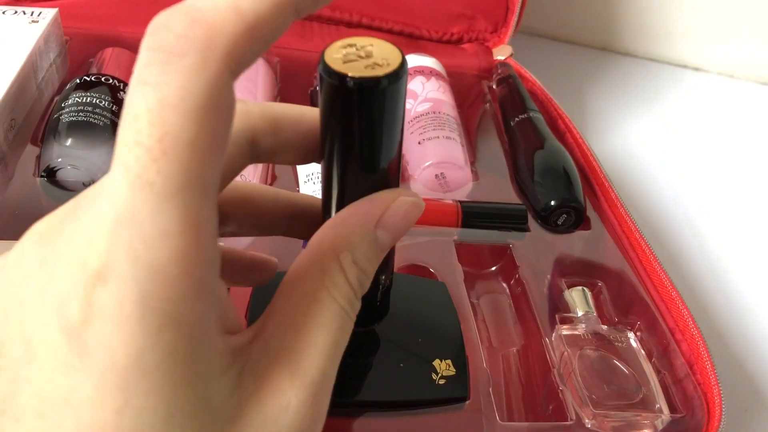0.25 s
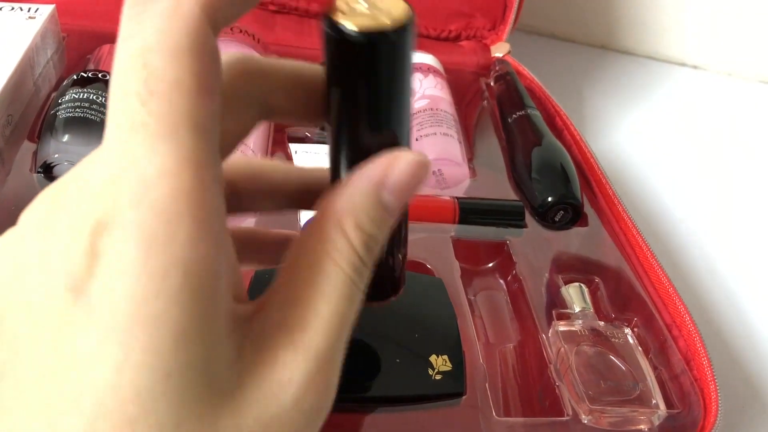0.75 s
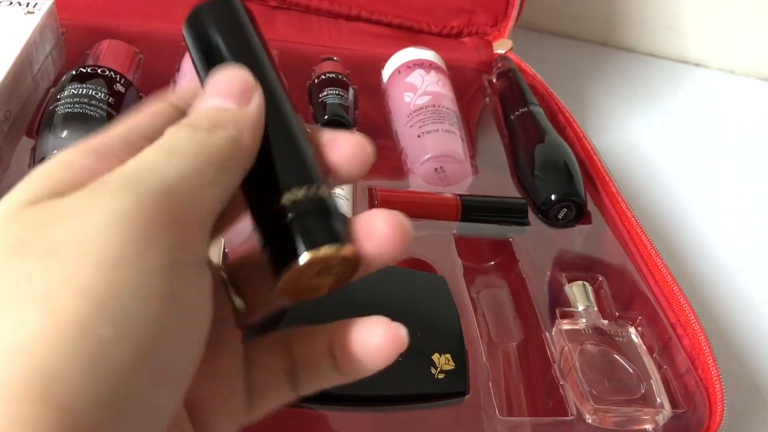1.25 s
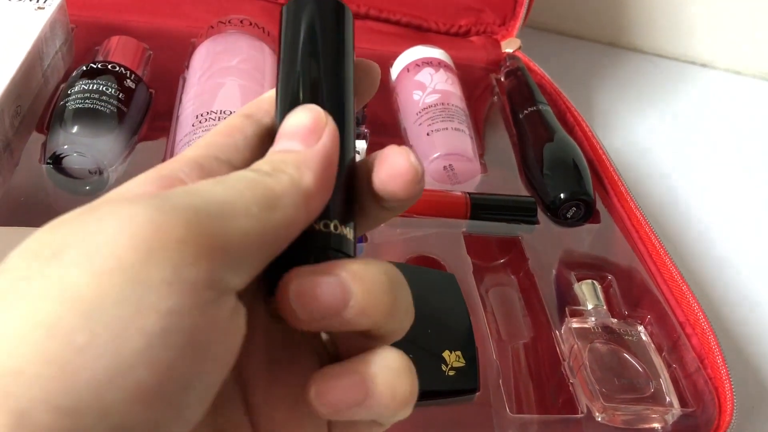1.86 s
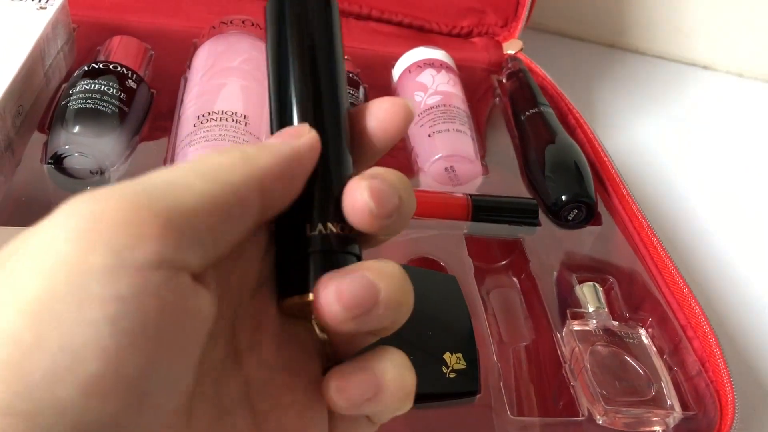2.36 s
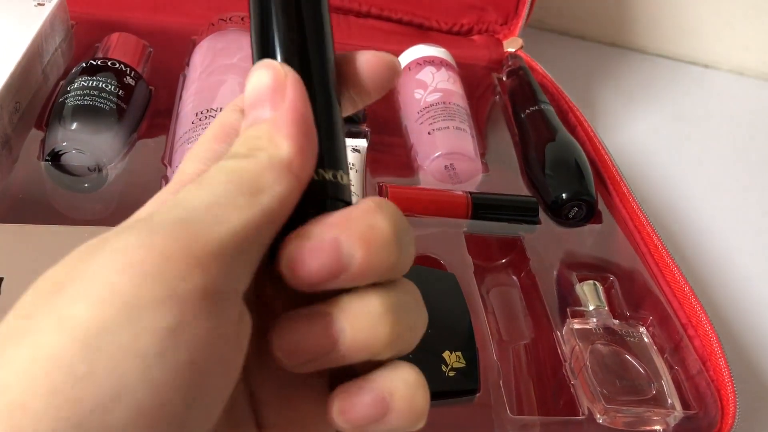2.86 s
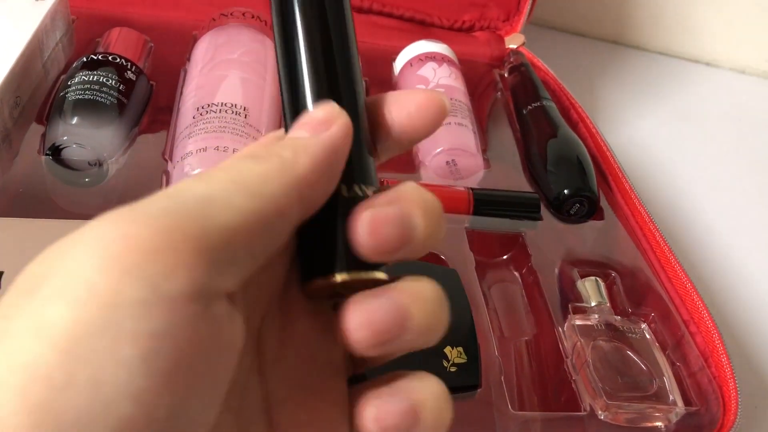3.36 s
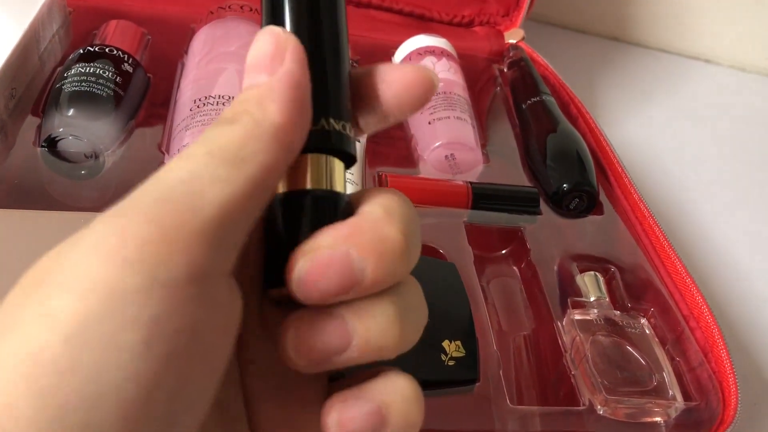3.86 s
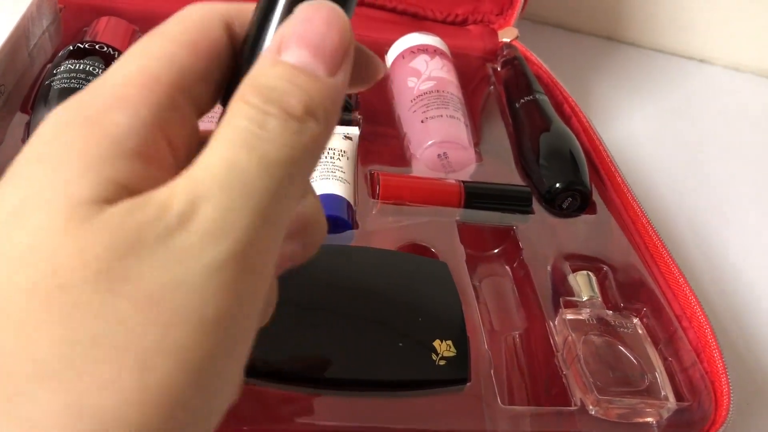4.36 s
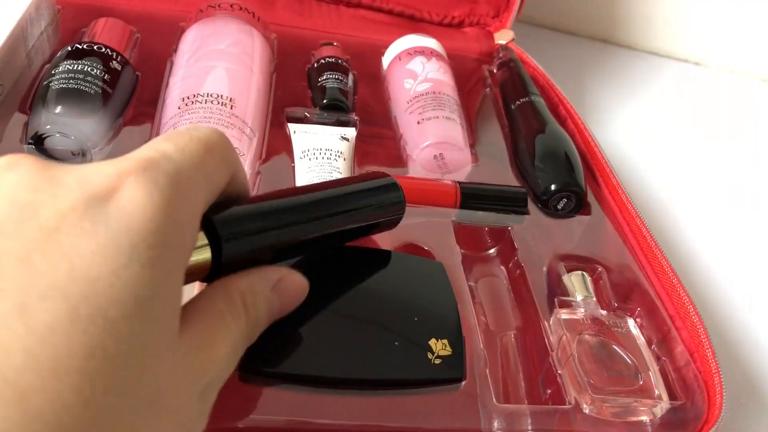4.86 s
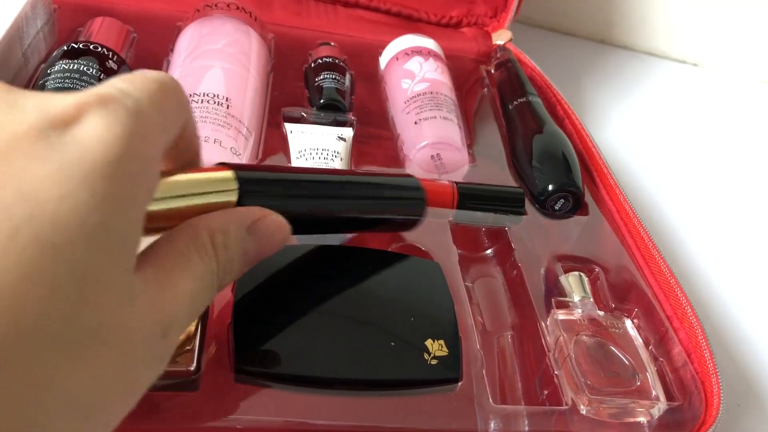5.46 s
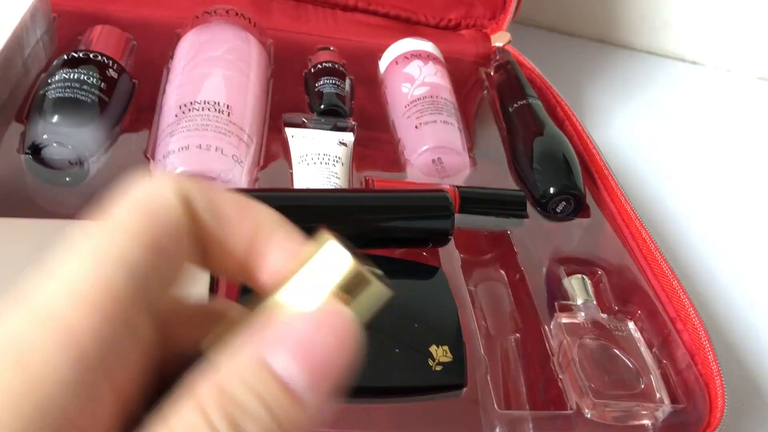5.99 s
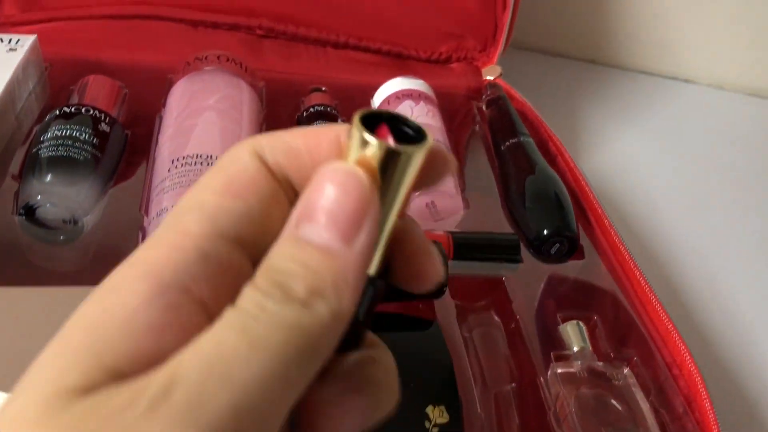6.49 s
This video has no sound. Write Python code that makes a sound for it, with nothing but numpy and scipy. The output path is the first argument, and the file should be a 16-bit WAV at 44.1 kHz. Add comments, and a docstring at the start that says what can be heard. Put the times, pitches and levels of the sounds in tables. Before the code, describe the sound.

Small dry clicks of a lipstick in the hand, heard close with short indoor reflections and a faint hush beneath. Skin slips in short squeaks and stuttering creaks, mixed with hollow ticks. A sharp snap comes past the middle, later plastic knocks and a short scrape, a metallic pull, and the loudest clack as the cap lands and bounces on the tray.

```python
"""A lipstick in a glossy case is turned in the hand close by, in a quiet room.
First come a few light taps and rattles: short rough contacts that ring the hollow case and metal tube.
Then the thumb creaks and squeaks on the lacquer in trains of slips, among more clicks and rattles.
Last, the lipstick is pulled from its cap and the cap falls on a thin plastic tray: knocks, metallic
rings and scrapes. Shaped noise gives the room tone and a distant outdoor wash underneath all of it."""
import sys
import numpy as np
from scipy import signal
from scipy.fft import irfft
from scipy.io import wavfile
from scipy.ndimage import uniform_filter1d

SR = 44100
rng = np.random.default_rng(int(sys.argv[2]) if len(sys.argv) > 2 else 0)


def store_pcm(level_fs):
    """Save levels as 16-bit WAV."""
    pcm = np.round(np.clip(level_fs, -1, 1) * 32767).astype(np.int16)
    wavfile.write(sys.argv[1], SR, np.atleast_2d(pcm).T)


N = 296793  # length in samples


def gain_of(db):
    """Turns decibels into a factor."""
    return 10 ** (np.asarray(db) / 20)


def evened(x):
    """Scales to rms 1."""
    return x / np.sqrt(np.mean(x ** 2) + 1e-20)


def peaked(x):
    """Scales to peak 1."""
    return x / abs(x).max()


def read(points, hz):
    """Looks up a curve over pitch, on a log-frequency axis."""
    f, value = np.transpose(points)
    return np.interp(np.log(hz + 1), np.log(f + 1), value)


def add(mix, s, sound):
    """Mixes a sound in at s seconds."""
    part = mix[round(s * SR):][:len(sound)]
    part += sound[:len(part)]


def band(x, lo_hz, hi_hz):
    """Keeps only the pitches between two limits."""
    sos = signal.butter(3, [lo_hz, min(hi_hz, SR / 2.1)], "band", fs=SR, output="sos")
    return signal.sosfilt(sos, x)


def resonate(x, hz, width):
    """A steep resonance: shifts the pitch hz down to zero, smooths twice, and shifts back."""
    turn = np.exp(2j * np.pi * np.cumsum(hz * np.ones(len(x))) / SR)
    r = np.exp(-np.pi * width / SR)
    smooth = signal.lfilter([(1 - r) ** 2], [1, -2 * r, r * r], x / turn)
    return 2 * (turn * smooth).real


# thumb strokes: (skin resonance first and last f/Hz, snap level/dB re skin,
# snap resonance first and last f/Hz, unevenness 0-1 at full pressure,
# curve of (t/s, pressure level/dB, slips per s))
THUMB_STROKES = [ (2000, 2000, 5, 7400, 6800, 1, [(1.33, -99, 430), (1.4, -82, 410), (1.44, -84, 450)]),
                 (1300, 1300, -6, 8000, 7000, .16, [(1.63, -82, 370), (1.68, -75, 346), (1.72, -63, 290),
                 (1.755, -67, 212), (1.77, -76, 200), (1.91, -77, 200)]),
                 (1520, 1500, 1, 5100, 5800, 0.38, [(1.93, -83.5, 143), (2.02, -70.5, 123),
                 (2.125, -78, 294), (2.145, -100, 490)]),
                 (2450, 1700, -0.5, 6200, 5500, 0.16, [(2.474, -67, 260), (2.487, -60, 285),
                 (2.515, -65, 247), (2.53, -74, 240), (2.655, -72, 240), (2.678, -63, 300),
                 (2.695, -60, 370), (2.712, -84.5, 390)]),
                 (1500, 2040, 1, 9200, 7500, 0.98, [(2.71, -86, 480), (2.75, -78.5, 440), (2.88, -81, 400),
                 (2.93, -80, 450)]), (3300, 3400, -21, 4200, 5000, 0.1, [(2.808, -72, 1500),
                 (2.835, -66, 880), (2.848, -65.5, 850), (2.862, -65, 1940), (2.868, -91, 1700)]),
                 (1830, 1810, 2, 6700, 7800, .6, [(2.925, -80, 300), (2.95, -73, 300), (2.97, -73, 244),
                 (3.005, -88, 335)]), (4900, 3600, -1, 9200, 7000, 0.07, [(3.4825, -69, 205),
                 (3.525, -64, 205), (3.542, -61, 280), (3.562, -63, 464), (3.58, -64, 671),
                 (3.59, -64, 771), (3.6, -65, 812), (3.61, -66, 995), (3.628, -70, 1229),
                 (3.642, -78, 1320)]), ]
# the case wall under a slip: (f/Hz, width/Hz, level/dB)
WALL_MODES = [(3400, 3000, -3.5), (11600, 2700, -7.5), (14400, 1600, -5.5)]
SLACK_PER_DB = 0.03  # slips grow uneven as the pressure eases
SNAP_FADE_RATE = 550  # above this many slips per s the snap weakens


def stroke(skin_hz, skin_end_hz, snap_db, snap_hz, snap_end_hz, firm, rows):
    """Skin sticks and slips on the lacquer: each slip is a tiny snap, fast slips merge into a squeak."""
    s, *columns = np.transpose(rows)
    t = np.arange(s[0], s[-1], 1 / SR)
    db, rate = (np.interp(t, s, c) for c in columns)
    hz = np.linspace(skin_hz, skin_end_hz, len(t))
    snap_hz = np.linspace(snap_hz, snap_end_hz, len(t))
    slack = SLACK_PER_DB * (db.max() - db) * np.sqrt(abs(firm) / .3)
    uneven = np.clip(firm + slack, 0, 1.1)
    wobble, size, bite, hiss, grit = rng.standard_normal((len(t), 5)).T
    wobble = evened(uniform_filter1d(wobble, size=250))

    # one slip at each whole turn, shared between two samples when it falls between them
    turns = np.cumsum(rate * np.exp(0.5 * uneven * wobble)) / SR
    slips = np.diff(np.floor(turns), prepend=0) * gain_of(5.5 * uneven * size)
    early = np.clip(turns % 1 / np.diff(turns, prepend=-1), 0, 1)
    slips = slips * (1 - early) + np.roll(slips * early, -1)

    rub = evened(slips) + 1.5 * uneven * hiss
    skin = resonate(rub, hz, (.78 + uneven.mean()) * hz.mean())
    skin = evened(skin - .55 * resonate(rub, np.maximum(rate, 950), 700))

    # skin lets go in a rough fraction of a millisecond
    release = signal.lfilter([1], [1, -.9], slips * gain_of(2.9 * bite))
    tear = evened(release * 1.5 * uneven * grit + .3 * slips) + 1.1 * uneven * hiss
    snap = resonate(tear, snap_hz, 3240)
    for k, (f, width, d) in enumerate(WALL_MODES):
        snap = snap + gain_of(d) * np.roll(resonate(tear, f, width), 23 * k + 17)
    snap = evened(snap) * np.minimum(SNAP_FADE_RATE / rate, 1)
    sound = skin + gain_of(snap_db) * snap
    return s[0], gain_of(db) * sound * signal.windows.tukey(len(t), .1)


# slow slips of the thumb, heard one by one:
# (t/s, peak level/dB, skin resonance f/Hz, snap resonance f/Hz, snap level/dB re skin)
SLOW_SLIPS = [(1.761, -58, 1140, 8100, -10), (1.779, -56, 1900, 3500, -6), (1.799, -59, 1600, 7890, -10),
              (1.806, -59, 1400, 4000, -4), (1.821, -60, 1410, 8180, -0.6), (1.831, -58, 1270, 7590, -0.6),
              (1.844, -57, 1420, 4500, -5), (1.853, -55, 1500, 7090, -0.6), (1.864, -54, 1390, 6750, -0.6),
              (2.52, -56, 2940, 6620, -0.6), (2.525, -56, 1460, 5610, -0.6), (2.531, -59, 2890, 5880, -0.6),
              (2.536, -58, 1170, 6060, -0.6), (2.551, -58, 2140, 6070, -0.6), (2.56, -59, 3070, 6130, -0.6),
              (2.568, -57, 3340, 6560, -0.6), (2.578, -63, 2100, 6830, -0.6),
              (2.589, -55, 2190, 5960, -0.6), (2.745, -63, 980, 6170, -0.6), (2.753, -62, 1180, 6750, -0.6),
              (2.761, -62, 877, 6730, -0.6), (2.771, -60, 912, 8130, -0.6), (2.781, -59, 869, 6780, -0.6),
              (2.794, -61, 842, 5730, -0.6), (2.805, -59, 3150, 4700, -0.6), (2.88, -55, 1470, 5380, -9),
              (2.89, -57, 2000, 4520, -8), (2.903, -61, 2380, 8500, -0.6), (2.907, -63, 1380, 9400, -0.6),
              (2.917, -60, 1210, 6980, -0.6), (2.932, -62, 1780, 6900, -0.6),
              (2.937, -56, 1700, 9470, -0.6), (2.943, -56, 1460, 7000, -0.6),
              (2.951, -53, 1610, 6970, -0.6), (2.961, -53, 2340, 6960, -0.6), (2.964, -55, 888, 7020, -0.6)]
SLIP_MS, SLIP_WIDTH_HZ = 1.1, 1500  # fading time of the puff, width of the skin resonance


def slip(s, db, skin_hz, snap_hz, snap_db):
    """One stick-slip release: a rough puff through the skin and the case wall."""
    t = np.arange(600) / SR
    puff = rng.standard_normal(len(t)) * np.exp(-1000 * t / SLIP_MS)
    snap = peaked(resonate(puff, snap_hz, 1.6 * SLIP_WIDTH_HZ))
    snap = snap + .55 * peaked(band(puff, 3000, 15000))
    skin = peaked(resonate(puff, skin_hz, SLIP_WIDTH_HZ))
    return s, gain_of(db) * (skin + gain_of(snap_db) * snap)


# taps and rattles in the hand that stand out: (t/s, crack level/dB, then levels/dB re crack of
# hollow body, treble and metal ring; the clearest also have contact/ms, brightest f/Hz and
# the level/dB re crack of that accent)
HAND_TICKS = [(0.036, -70, -6, 5, -23, 1.5, 5500, 3), (0.0435, -72, 2, 0, -25), (0.058, -73, 0, 6, -25),
              (0.0718, -50, 5, -20, -30, 1, 2300, -3), (0.0738, -40.5, -1, -3, -30, .8, 5150, -3),
              (0.0905, -60, 5, -16, -18), (0.6337, -52, -14, -12, -12, .6, 7150, 3),
              (0.6338, -54, -14, -20, -30, .6, 2735, 3), (0.638, -66, -14, -12, -12, 1, 7150, 3),
              (0.6497, -64, -16, -6, -12, 1, 7200, 0), (0.732, -65, 4.5, -22, -20),
              (0.7428, -66.5, 4.5, -22, -9), (1.3967, -64.5, -21, -12, -18), (1.6548, -63, 3, -10, -14),
              (1.7185, -60, 6, -12.5, -4), (1.8775, -54, -1, -12, -21, 2.2, 6800, 2),
              (1.8955, -51, -4.5, -10, -24, 2.6, 4500, -6), (1.9827, -46.5, -7, -5, -20),
              (2.0432, -53.5, -7, -11.5, -2), (2.062, -46.5, -5, -36, -13), (2.1092, -51.5, -4, -4.5, -9),
              (2.226, -57, -2, -5, -24), (2.4181, -58.5, -2, -8.5, -26),
              (2.607, -52, -6, -5, -21, 4, 2000, -4), (2.6331, -49, -9, -8, -24),
              (2.6525, -52, -6, -4, -29, 4, 2000, -3), (2.9805, -48.5, -2, -10, -23, 3, 3000, -8),
              (3.086, -54.5, -2.5, -9, -6), (3.1006, -51.5, -6, -4.5, -3), (3.109, -55, -1.5, -9, -16),
              (3.1515, -48.5, -10, 1.5, -9), (3.3755, -54, -2.5, -20, -12), (3.3901, -55, -2.5, -3.5, -18),
              (3.4398, -66, 4.5, -16, -22), (3.7172, -35, -9, -3, -25, 1.2, 3800, -9),
              (3.7197, -32, -8, -6, -19, 1.4, 8000, -6), (3.7245, -43, -4, -6, -20, 1.2, 10200, -5),
              (3.8064, -62.5, -5, -8.5, -5), (3.8352, -60.5, -2, 0.5, -9), (4.0476, -59.5, -5, -12, -7),
              (4.1358, -58.5, -16, -2.5, -24), (4.4634, -66, -4, -2, -16), (4.5408, -64, 1, -26, -8),
              (4.625, -56.5, -5, -5.5, -21), (6.269, -72.5, 11.5, -11, -42)]
# brightest pitch follows the treble share: (treble level/dB re crack, f/Hz)
BRIGHTNESS = [(-12, 2970), (-2, 7930)]
# dense ring of the hollow case: (f/Hz, level/dB, time to fall 60 dB/s)
HOLLOW_CASE = [(248, -6, 0.03), (390, 5, 0.03), (520, 2.5, 0.052), (822, 7.5, 0.038), (1170, 1, 0.032),
               (2060, -2.5, 0.042), (2960, -17.5, 0.028)]
CONTACT_MS, CONTACT_MS_PER_DB = 2.23, 0.09  # contact time of a -55 dB tick; softer ticks last longer
SPOT_SPREAD = 0.075  # stiffness varies from spot to spot
TICK_ACCENT_DB, CASE_LAG_MS, CASE_FAVOURED_HZ = -12, 1.4, 1400


def tick(s, crack_db, body_db, treble_db, ring_db, *own):
    """A blow on the hand-held case; strength and treble set contact and brightness unless it has its own."""
    ms = CONTACT_MS - CONTACT_MS_PER_DB * (crack_db + 55)
    bright_hz = np.interp(treble_db, *np.transpose(BRIGHTNESS))
    colour = own or (ms, bright_hz, TICK_ACCENT_DB)
    stiff = 1 + SPOT_SPREAD * rng.standard_normal()
    row = (s, crack_db, body_db, treble_db, ring_db, *colour, stiff, CASE_LAG_MS, CASE_FAVOURED_HZ)
    return blow(row, HOLLOW_CASE, dense=0.77, count=4000)


# small ticks in the hand, single or in short runs:
# (start t/s, end t/s, ticks per s, crack level/dB)
SMALL_TICKS = [(1.939, 1.97, 99, -59), (2.02, 2.098, 70, -57), (2.66, 2.67, 74, -53),
               (3.765, 3.8, 75, -59.5)]
PATTER_MIX, PATTER_SPREAD_DB = (-8, -8, -29), 1  # (body, treble, ring level/dB re crack), spread


def patter():
    """Lists small ticks at loosely even steps between start and end, sizes and colours by chance."""
    rows = []
    for start, end, rate, db in SMALL_TICKS:
        for k, (shift, *spread) in enumerate(rng.standard_normal((12, 5))):
            s = start + (k + .5 + .25 * shift) / rate
            if s < end:
                levels = np.array([db, *PATTER_MIX]) + PATTER_SPREAD_DB * np.array(spread)
                rows.append((s, *levels))
    return rows


# knocks as the lipstick is pulled from its cap and the cap falls on the tray: (t/s, crack level/dB,
# then levels/dB re crack of tray, treble and tube ring; contact/ms, brightest f/Hz, its accent
# level/dB re crack, stiffness of the spot as a factor on tray pitch, bending delay/ms,
# favoured tray f/Hz, cap ring and tray hollows levels/dB re crack)
CAP_KNOCKS = [(5.0605, -36, 0, -11, -18, 1.4, 4300, -6, 1, 1.4, 680, -30, -2),
              (5.079, -56, 2, -14, -20, 3, 4700, -8, 1, 1.5, 600, -30, -3),
              (5.1018, -41, 0, -15, -14, 1.2, 5500, -6, 1.1, 2.6, 1400, -30, -2),
              (5.1942, -69.5, 11.5, -20, -24, 2.5, 2880, -12, 1, 1, 900, -30, 1),
              (5.2724, -69, 9, -15, -20, 3, 2800, -12, .9, 1, 800, -30, -1),
              (5.3585, -62, -8, -7, -15, 1.7, 8000, -12, 0.93, 2, 1200, -30, -18),
              (5.4685, -29, -1, -12, -16, 1.5, 2940, -6, 1, 1.2, 600, -30, -8),
              (5.4868, -33, -12, -3, 6, 1, 8000, -12, 1, 1.5, 900, -25, -14),
              (5.5125, -55, -12, -6, -10, 1, 5700, -6, 1, 1.5, 900, -30, -22),
              (5.5448, -55, -8, -8, -8, 2, 2900, -8, 1, 1.5, 900, -30, -18),
              (5.5685, -56, -1, -6, 11, 2, 8000, -9, 1, 1, 2050, -30, -11),
              (5.584, -69, -3, -5, 13, 1.4, 2700, -12, 1.1, 2, 1200, -30, -13),
              (5.6124, -12, -4.5, -2, -20, 1.2, 4600, -6, 1, 3.6, 1550, -19, -17),
              (5.6525, -25.5, -1, -9, -24, 1.6, 2800, -10, 1, 2.2, 950, -20, -10),
              (5.6774, -21, -8, -4, -25, 1.3, 3250, -6, 1, 3, 1000, -3, -14),
              (5.6956, -34.5, -7, -13.5, -30, 1.8, 4200, -4, 0.89, 2.5, 600, -18, -10)]
# dense ring of the thin plastic sheet: (f/Hz, level/dB, time to fall 60 dB/s)
TRAY_SHEET = [(40, -27.5, 0.2), (70, -8, .35), (120, -5, .3), (173, 1, 0.3), (240, -5, .15), (298, 3, 0.12),
              (380, -5, .08), (500, 0, 0.039), (702.5, -2.5, 0.045), (960, 2, 0.069), (1250, -7, .03),
              (1610, 2, 0.024), (2037, -9.5, 0.063), (3400, -31.5, .06)]
# separate modes of the tray's moulded hollows: (f/Hz, level/dB, time to fall 60 dB/s)
TRAY_HOLLOWS = [(291, 0, .1), (450, -3, .07), (750, 0, .06), (935, 0, .06), (1165, -4, .05),
                (1500, 0, .035), (1780, -4, .045), (1995, -5, .05), (2500, -10, .03), (3150, -8, .03),
                (5300, -14, .02)]
# metal-lined cap: (f/Hz, level/dB, time to fall 60 dB/s)
METAL_CAP = [(3115, -6, .04), (5290, -6, .03), (6600, -14, .03), (7545, -8, .09), (7855, -1, .035),
             (9800, 1, .02), (9890, -13, .15), (10920, -8, .03), (14500, -16, .03)]
CAP_FAVOURED_HZ = 8000


def knock(*row):
    """A blow with the ring of the tray; the cap and the moulded hollows sound on their own pitches."""
    *hit, cap_db, hollows_db = row
    s, sound = blow(hit, TRAY_SHEET, dense=0.7, count=12000)
    t = np.arange(len(sound)) / SR
    crack_db, favoured_hz = hit[1], hit[-1]
    hollows = gain_of(hollows_db) * ring(TRAY_HOLLOWS, favoured_hz, t)
    cap = gain_of(cap_db) * ring(METAL_CAP, CAP_FAVOURED_HZ, t)
    return s, sound + gain_of(crack_db) * (hollows + cap)


# metal tube: (f/Hz, level/dB, time to fall 60 dB/s)
METAL_TUBE = [(2060, -4, 0.05), (2900, 3, 0.05), (4600, -14, .03), (7490, -4, 0.035), (9510, 4, .026),
              (14570, 1, .014), (15600, -6, .014)]
ACCENT_CHATTER = .1  # share of the chatter in the accent


def blow(row, body, dense, count):
    """A short rough contact cracks, and sets the hollow body and the metal tube ringing."""
    s, crack_db, body_db, treble_db, ring_db, ms, bright_hz, accent_db, *spot = row
    t = np.arange(count) / SR
    contact = rng.standard_normal(count) * np.minimum(t * 6000, 1)
    # the loose fit keeps chattering
    chatter = abs(signal.lfilter([1], [1, -.97], rng.standard_normal(count) ** 3)) / 14
    chatter = contact * 0.065 * chatter * np.exp(-t / .022)
    first = contact * np.exp(-1000 * t / max(ms, .2))
    contact = first + chatter

    treble = band(contact, 4630, 11300) + .4 * band(contact, 12500, 15200)
    accent = resonate(first + ACCENT_CHATTER * chatter, bright_hz, 1300)
    crack = peaked(band(contact, 1000, 7200))
    crack = crack + gain_of(treble_db) * peaked(treble) + gain_of(accent_db) * peaked(accent)
    hollow = gain_of(body_db) * flex(body, *spot, dense, count)
    tube = gain_of(ring_db) * ring(METAL_TUBE, bright_hz, t)
    fade = np.cos(np.pi / 2 * t / t[-1])
    return s, gain_of(crack_db) * (crack + hollow + tube) * fade


FAVOUR_DB_PER_OCTAVE = 4  # loss away from the favoured pitch, for at most two octaves


def flex(body, stiff, lag_ms, favoured_hz, dense, count):
    """Bending waves: treble outruns bass in a falling sweep; its many reflections blur into a decay."""
    table = np.array(body) * [stiff, 1, 1]
    colour, decay = table[:, :2], table[:, ::2]
    hz = np.fft.rfftfreq(count, 1 / SR)
    lag = stiff ** 2 * lag_ms / 1000 * (1000 / np.maximum(hz, 450)) ** 1.3  # seconds
    octaves = np.minimum(abs(np.log2((hz + 1) / favoured_hz)), 2)
    level = gain_of(read(colour, hz) - FAVOUR_DB_PER_OCTAVE * octaves)
    # summing the delay over pitch gives the phase
    sweep = irfft(level * np.exp(-2j * np.pi * np.cumsum(lag) * hz[1]))

    hz, t, z = signal.stft(rng.standard_normal(count), SR, nperseg=256, noverlap=192)
    fading = z * gain_of(-60 * t / read(decay, hz)[:, None])
    blur = signal.istft(fading, SR, nperseg=256, noverlap=192)[1]
    blur = signal.fftconvolve(sweep[:1500], blur)[:count]
    return peaked(evened(sweep) + dense * evened(blur))


def ring(modes, centre_hz, t):
    """Dying sines; the blow favours modes near one pitch, and a loose fit re-strikes them."""
    share_db = 2 * rng.standard_normal(len(modes))
    tones = 0
    for (hz, db, t60), d in zip(modes, share_db):
        level_db = db + d - 4.5 * abs(np.log2(hz / centre_hz)) - 60 * t / t60
        tones = tones + gain_of(level_db) * np.sin(2 * np.pi * hz * t)
    rattle = rng.standard_normal(len(t)) ** 3 * np.exp(-t / 0.012) * 0.006
    rattle[0] = 1  # the first strike
    return peaked(signal.fftconvolve(tones, rattle)[:len(t)])


# scraping sounds among and after the knocks, one curve a scrape: (t/s, level/dB)
SCRAPES = [
    [(5.3, -101), (5.348, -64), (5.414, -81), (5.446, -62.5), (5.46, -62)],
    [(6.55, -94), (6.656, -81), (6.73, -81)],
]
# resonances heard in the scrape: (f/Hz, width/Hz, level/dB)
SCRAPE_RESONANCES = [(1297, 320, 2), (2702, 1100, -15.5), (5356, 800, -15), (7540, 790, -18)]


def scrape(rows):
    """Dense uneven grains of noise excite a few wide resonances."""
    s, db = np.transpose(rows)
    t = np.arange(s[0], s[-1], 1 / SR)
    size, chance = rng.standard_normal((len(t), 2)).T
    grains = size * (0.098 + (chance > 2))  # a few stand out from a fine bed
    sound = sum(gain_of(d) * resonate(grains, f, width) for f, width, d in SCRAPE_RESONANCES)
    return s[0], gain_of(np.interp(t, s, db)) * evened(sound)


def walls(x, decay):
    """Echoes: sparse taps of random sign, each band dying at its own speed."""
    taps = np.zeros(SR // 2)
    at = np.arange(120, len(taps) - 20, 20)
    taps[at + rng.integers(0, 20, len(at))] = rng.choice([-1., 1.], len(at))
    hz, t, z = signal.stft(taps, SR, nperseg=256)
    tail = signal.istft(z * gain_of(-60 * t / read(decay, hz)[:, None]), SR, nperseg=256)[1]
    return signal.fftconvolve(x, tail / np.linalg.norm(tail))[:N]


def noise(colour, patchy_db):
    """Background hush: random short-time spectra with drifting patches, rms 1."""
    hz = np.fft.rfftfreq(2048, 1 / SR)
    a, b, patches = rng.standard_normal((N // 512 + 5, 1025, 3)).T
    patches = uniform_filter1d(patches, size=8, axis=0)
    patches = evened(uniform_filter1d(patches, size=6, axis=1))
    z = (a + 1j * b) * gain_of(read(colour, hz)[:, None] + patchy_db * patches)
    return evened(signal.istft(z, nperseg=2048, noverlap=1536)[1][:N])


# nearby walls and table: (f/Hz, time to fall 60 dB/s)
NEAR_WALLS = [(200, 0.16), (1000, 0.19), (4000, 0.14), (15000, 0.076)]
# the room beyond: (f/Hz, time to fall 60 dB/s)
ROOM_BEYOND = [(200, 0.94), (1000, 0.15), (5000, 0.53), (15000, 0.15)]
# distant outdoor wash: (t/s, level/dB)
FAR_LEVEL = [(0, -72.5), (.5, -78.5), (1.4, -82), (2, -78), (3.5, -84), (5, -84), (5.901, -82), (6.4, -101),
             (6.73, -75.5)]
# its colour: (f/Hz, relative level/dB per Hz)
FAR_SPECTRUM = [(100, -22), (170, 3.5), (350, 0.5), (700, -5.5), (1050, -3.5), (1140, -3), (1220, -9),
                (3000, -19.5), (8000, -32)]
# colour of the room tone: (f/Hz, relative level/dB per Hz)
ROOM_TONE = [(15, -50), (25, -29), (60, -17.5), (97, 3.5), (128, -10.5), (168, -8.5), (360, -18),
             (571, -23.5), (637, -23), (1040, -28), (1130, -28), (2350, -34.5), (6980, -39), (14200, -42),
             (16700, -54.5)]
ROOM_TONE_DB = -69


def scene():
    """Hand, cap and tray sounds with their reflections over the room tone and the outdoor wash."""
    near = np.zeros(N)
    for row in CAP_KNOCKS:
        add(near, *knock(*row))
    for row in SLOW_SLIPS:
        add(near, *slip(*row))
    for row in HAND_TICKS + patter():
        add(near, *tick(*row))
    for row in THUMB_STROKES:
        add(near, *stroke(*row))
    for rows in SCRAPES:
        add(near, *scrape(rows))
    far_db = np.interp(np.arange(N) / SR, *np.transpose(FAR_LEVEL))
    far = gain_of(far_db) * noise(FAR_SPECTRUM, patchy_db=1.27)
    echoes = gain_of(-16.0) * walls(near, NEAR_WALLS) + gain_of(-32) * walls(near, ROOM_BEYOND)
    room_tone = gain_of(ROOM_TONE_DB) * noise(ROOM_TONE, patchy_db=2.0)
    return (near + echoes + far + room_tone)[None]


def record(dry):
    """A steep low-pass takes away the highest treble."""
    low_pass = signal.firwin(511, 16750, window=("kaiser", 9), fs=SR)  # edge in Hz
    return signal.oaconvolve(dry, low_pass[None], "same")


dry = scene()
out = record(dry)
store_pcm(out)
```